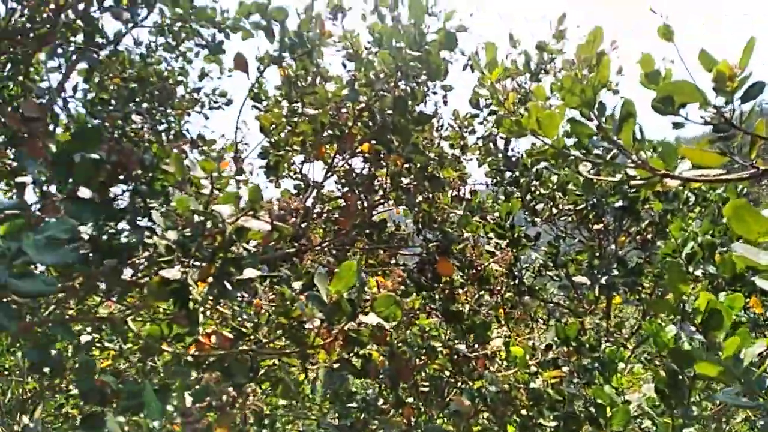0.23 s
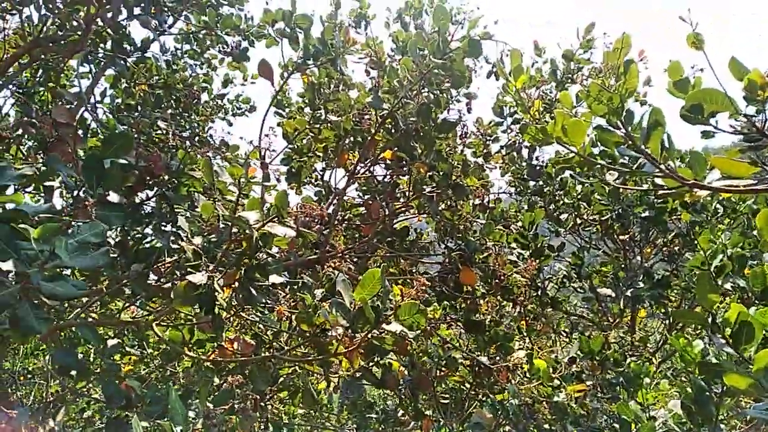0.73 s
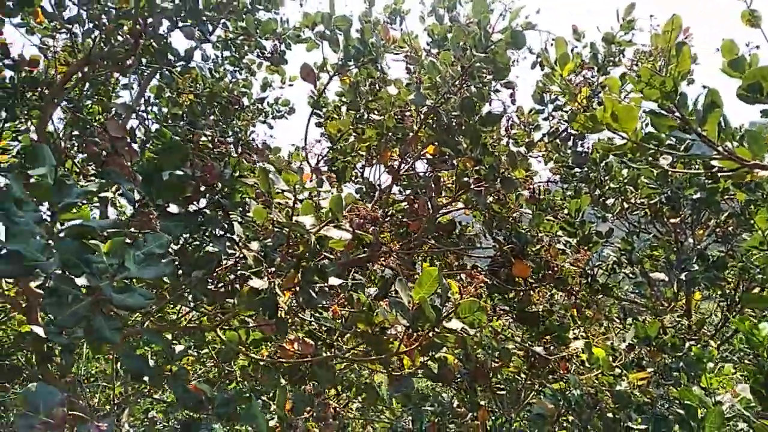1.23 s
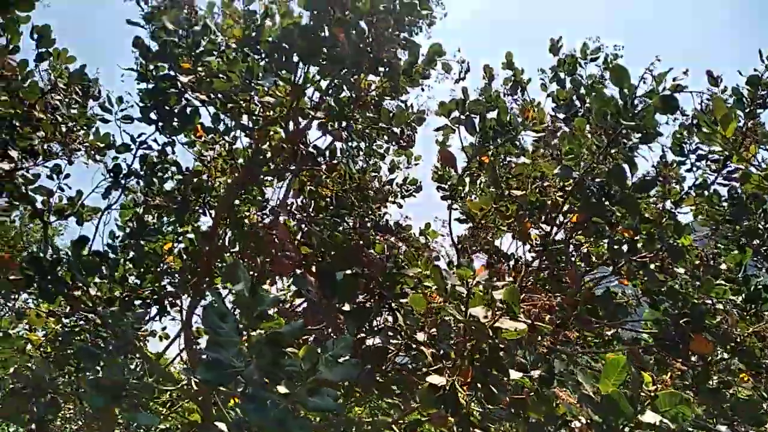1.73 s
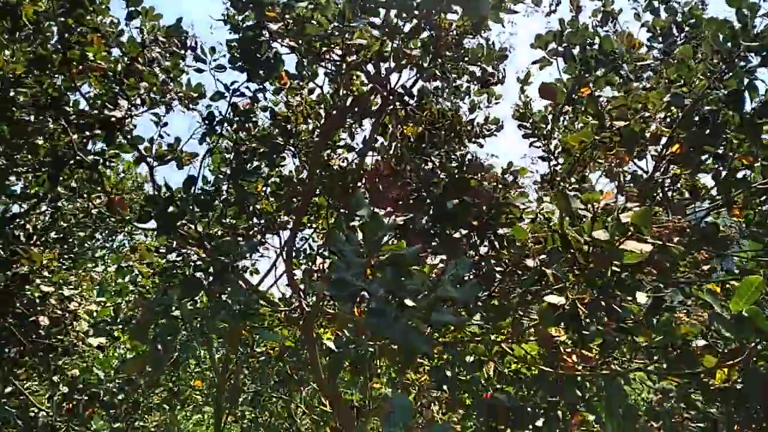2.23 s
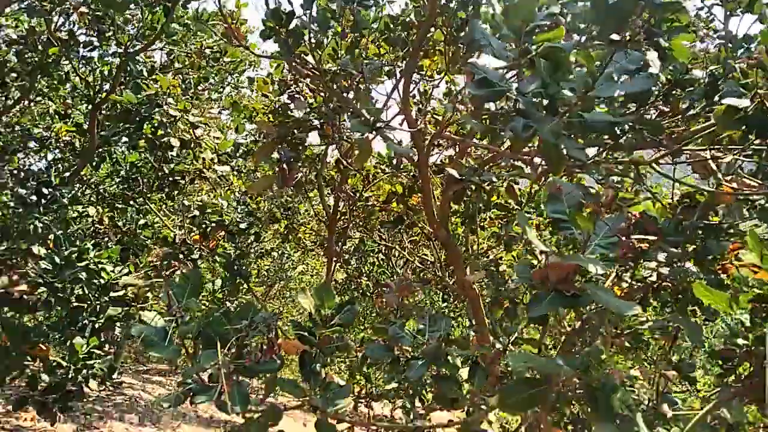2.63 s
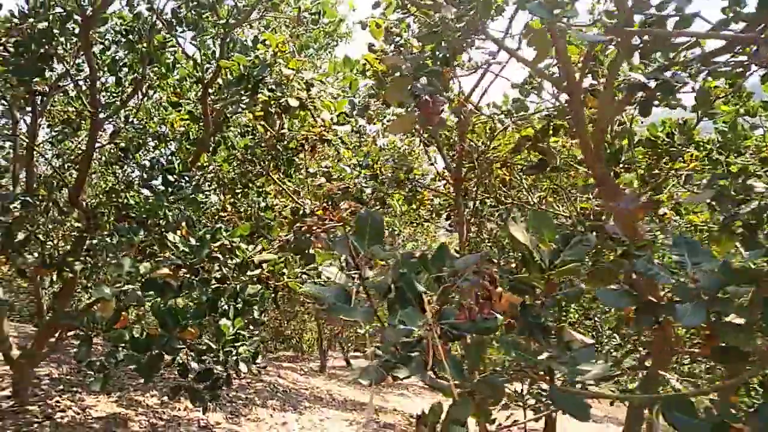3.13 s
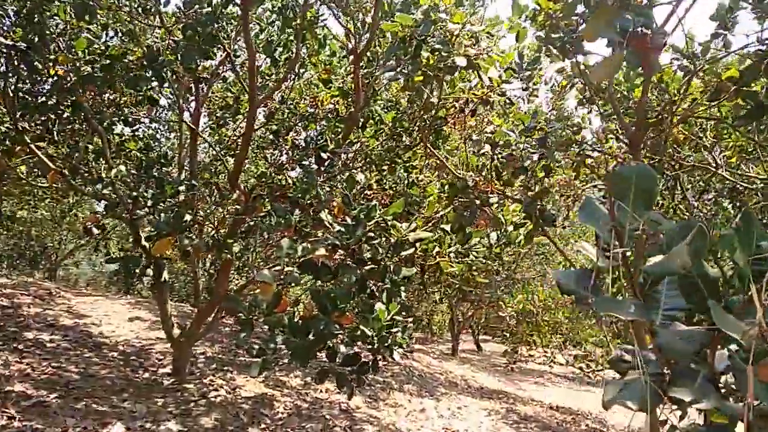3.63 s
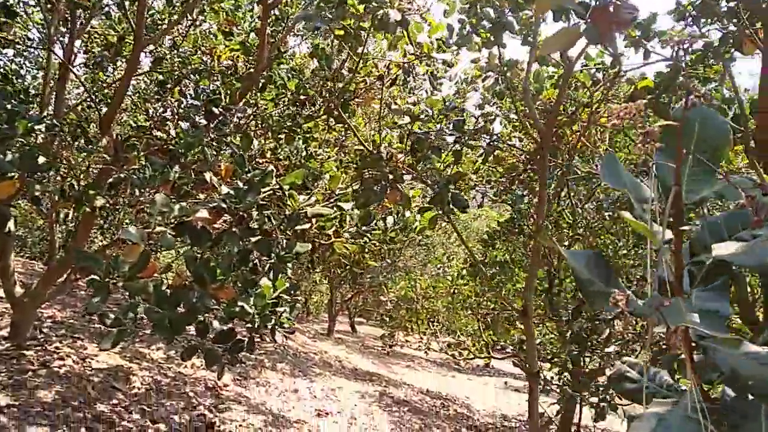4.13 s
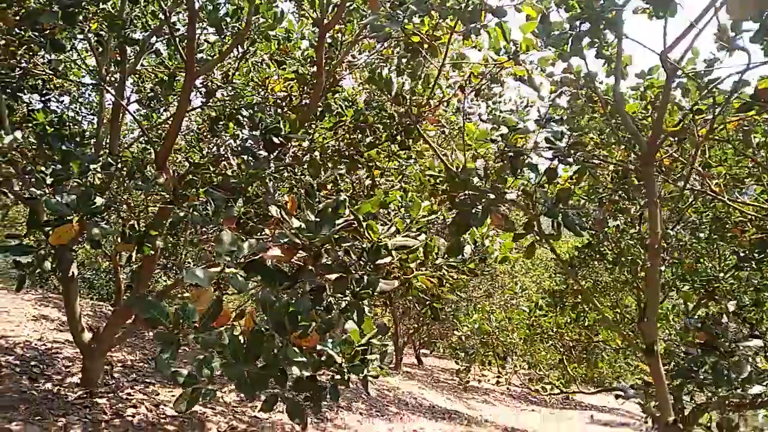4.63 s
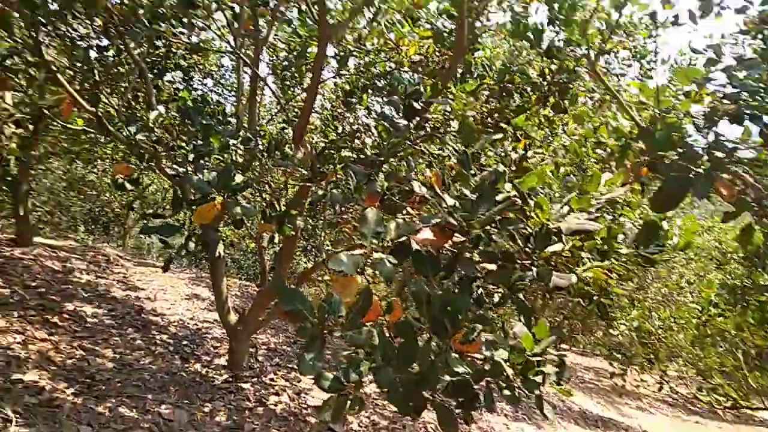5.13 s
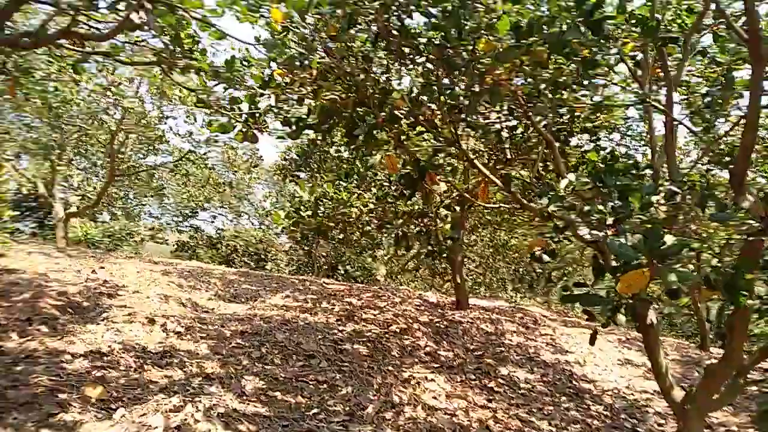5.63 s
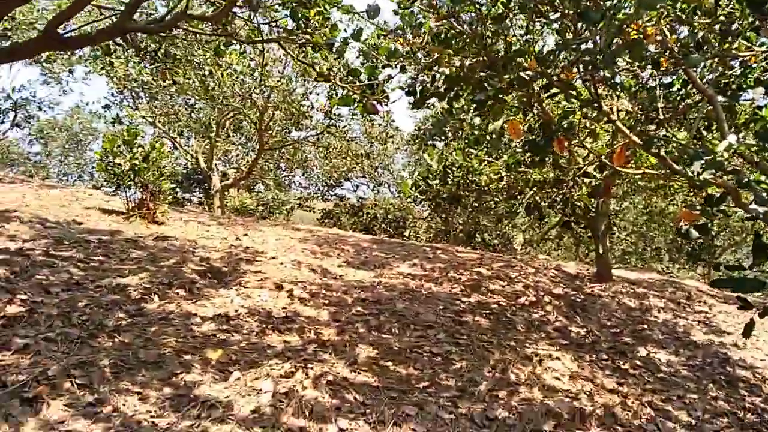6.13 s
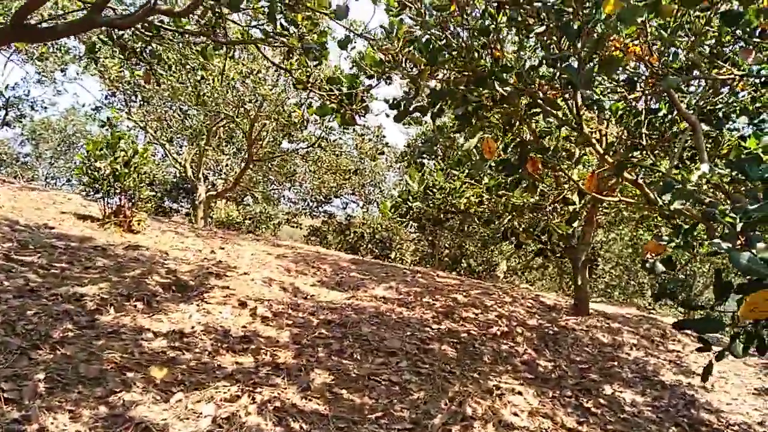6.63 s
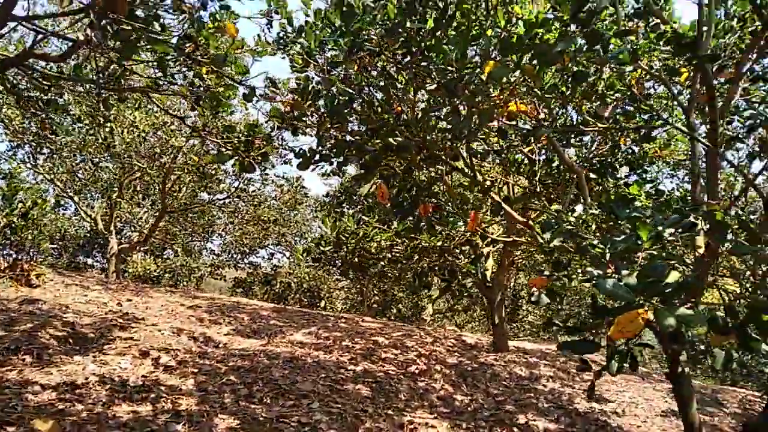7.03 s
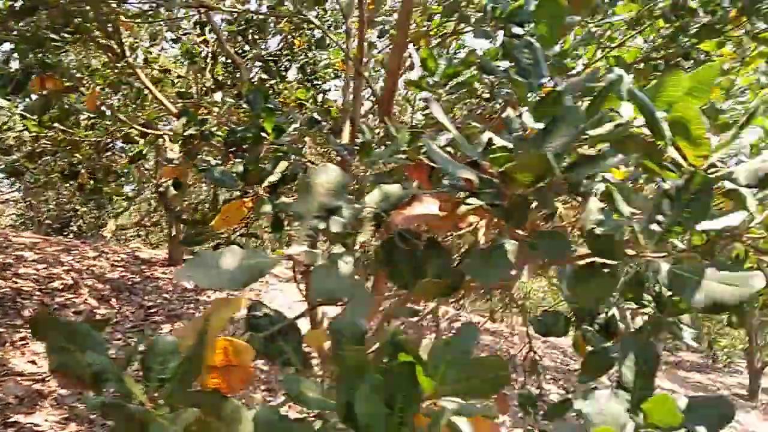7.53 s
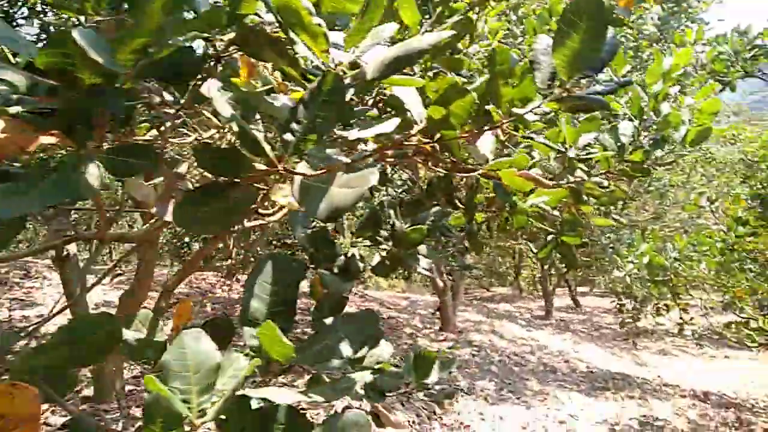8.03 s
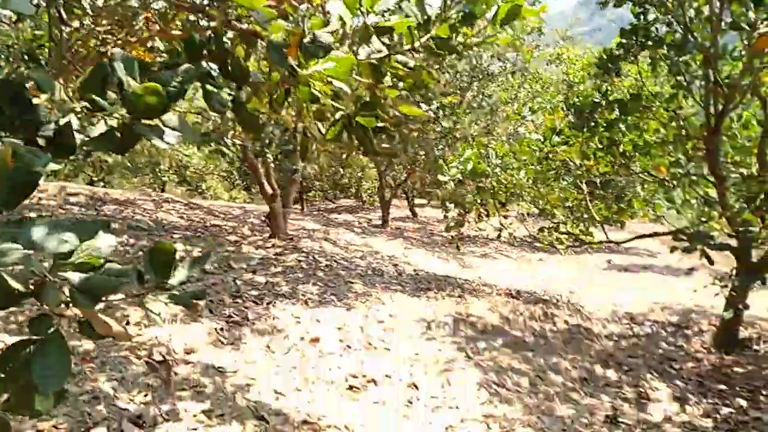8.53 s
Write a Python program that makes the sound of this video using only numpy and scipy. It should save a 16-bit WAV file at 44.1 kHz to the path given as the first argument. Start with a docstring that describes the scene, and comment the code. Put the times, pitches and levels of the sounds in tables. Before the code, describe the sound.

Outdoors among trees, small birds chirp and glide over a faint, regular motor putter. After nearly three quiet seconds, nearby feet crunch irregularly into brittle leaves, with sharp twig cracks and rustling branches. The handheld microphone takes wind directly: deep fluttering gusts switch between left and right, heaviest on the left around seven seconds. A lull in the walking comes before the final crunches.

```python
"""Birds whistle in an orchard's soft hush while a slow one-cylinder engine, perhaps a water pump, thuds far away.
A few leaves snap, then someone walks over dry fallen leaves and brushes through the branches.
Wind, faint at first, buffets the two microphone ports once the walk begins.
Birds and engine are sines and shaped noise, leaves are swarms of tiny decaying cracks,
and wind is low noise with sharp pressure pulses."""
import sys
import numpy as np
from scipy import signal
from scipy.fft import rfft, irfft, next_fast_len
from scipy.io import wavfile
from scipy.ndimage import uniform_filter1d, map_coordinates

SR = 44100
rng = np.random.default_rng(int(sys.argv[2]) if len(sys.argv) > 2 else 0)


def pcm_store(signal):
    """Save signal as 16-bit PCM."""
    levels = np.round(np.clip(np.atleast_2d(signal), -1, 1) * 32767)
    wavfile.write(sys.argv[1], SR, levels.astype(np.int16).T)


N = 387198  # length of the scene in samples
TOP_HZ = 15900  # nothing is heard above this


def amp(db):
    """Decibels to gain."""
    return 10 ** (np.asarray(db) / 20)


def unit(x):
    """Scale a signal to rms 1."""
    return x / np.sqrt(np.mean(x ** 2) + 1e-20)


def along(points, hz):
    """Read (Hz, value) points as a curve on a log frequency axis."""
    f, v = np.transpose(points)
    return np.interp(np.log(hz + 1), np.log(f + 1), v)


def curves(rows):
    """Draw one value per sample for each column after the time."""
    seconds, *columns = np.transpose(rows)
    return [np.interp(np.arange(N) / SR, seconds, column) for column in columns]


def wobble(rate):
    """A smooth random curve with the given number of knots a second."""
    knots = rng.standard_normal(int(N * rate / SR) + 4)
    return map_coordinates(knots, [np.arange(N) * rate / SR])


def filtered(x, response):
    """Shape a signal with a response of frequency, padded so that the ends do not wrap."""
    m = next_fast_len(N + SR // 2)
    return irfft(rfft(x, m) * response(np.fft.rfftfreq(m, 1 / SR)), m)[..., :N]


def coloured(x, spectrum):
    """Shape a signal with a spectrum in dB, then scale it to rms 1."""
    return unit(filtered(x, lambda hz: amp(along(spectrum, hz))))


def noise(alike):
    """White stereo noise whose channels share a part: 0 none, 1 all of it."""
    share = np.clip(alike, 0, 1)
    common = np.sqrt(share) * rng.standard_normal(N)
    return common + np.sqrt(1 - share) * rng.standard_normal((2, N))


def add(track, s, sound):
    """Mix a sound into a track at s seconds."""
    start = max(round(s * SR), 0)
    part = track[..., start:start + sound.shape[-1]]
    part += sound[..., :part.shape[-1]]


def swell(s, attack, hold, release):
    """An envelope that reaches 1 at s seconds, holds, then dies away."""
    t = np.arange(N) / SR - s
    rise = (np.minimum(t, 0) / attack) ** 2
    fall = np.maximum(t - hold, 0) / release
    return np.exp(-np.minimum(rise + fall, 30))


def patchy(x, depth_db):
    """Broad and narrow random patches of level vary the noise's colour over time and frequency."""
    z = signal.stft(x, nperseg=512)[2]
    broad = uniform_filter1d(rng.standard_normal(z.shape[1:]), size=7, axis=0)
    broad = uniform_filter1d(broad, size=10, axis=1)
    narrow = uniform_filter1d(rng.standard_normal(z.shape[1:]), size=8, axis=1)
    shaped = z * amp(depth_db * unit(broad) + 2.2 * unit(narrow))
    return unit(signal.istft(shaped, nperseg=512)[1][:, :N])


# Tone of the orchard's background air. Each row: frequency in Hz, relative level in dB.
AIR_TONE = [(20, -24), (70, -13), (250, 1), (500, 2.5), (1000, -5.5), (2200, -1.5), (4500, -13.5),
            (8000, -13), (16000, -20.5)]


def hush():
    """The orchard's background air is patchy, broad noise, nearly separate at the two ports."""
    return amp(-64.5) * coloured(patchy(noise(0.11), depth_db=2.5), AIR_TONE)


# Bird motifs, as glides through points. Each row: seconds from the motif's start, pitch in Hz before
# the call's pitch ratio, level in dB relative to the call.
FALL = [(0, 1563, -14), (0.031, 1970, -0.5), (0.063, 1870, -3.5), (.092, 1716, -1.5), (.135, 1680, -17)]
RISE = [(0, 2090, 4.5), (.025, 2230, -0.5), (.05, 2480, 0.5), (.075, 2470, -11)]
ARCH = [(0, 1800, 2), (.018, 2300, -5), (.036, 2560, 0), (.06, 2650, -14.5), (.12, 2680, -19)]
SCOOP = [(0, 2440, 0.5), (.03, 2020, -3), (.08, 2016, -3), (.096, 2700, 1), (.118, 3620, -5)]
WARBLE = [(0, 3294, -10), (.024, 2683, -7), (.051, 2310, -1), (0.094, 2502, -3), (0.124, 2600, -10.5),
          (0.179, 2316, -5.5)]
CHIP = [(0, 2182, 1), (.035, 1848, -14)]
# The nearer birds' calls. Each row: start in seconds, motif, level in dB before the trees scatter it,
# pitch ratio.
BIRD_CALLS = [(0, CHIP, -55, 0.95), (.008, FALL, -54.5, 1.01), (.396, ARCH, -50.5, 1),
              (.629, SCOOP, -51.5, 0.97), (.63, RISE, -63, 1.28), (.772, WARBLE, -43.5, 1.01),
              (1.085, CHIP, -61.5, 0.94), (1.245, CHIP, -59, 0.96), (1.747, FALL, -51.5, 0.99),
              (1.79, RISE, -62, 1.01), (1.955, RISE, -61, 1.03), (2.11, RISE, -63, 1),
              (2.275, RISE, -55.5, 1.04), (2.44, RISE, -59, 1.07), (2.465, CHIP, -57, 1.5),
              (2.515, RISE, -59, 1.36), (2.605, RISE, -59.5, 1.02), (2.76, RISE, -60.5, 1.05),
              (2.82, FALL, -53.5, 1), (5.338, RISE, -48.5, 1.06), (5.975, FALL, -52, 0.99),
              (6.39, CHIP, -60, 0.92), (6.505, CHIP, -63, 1.28)]
FAR_BIRD_DB = -76.5  # softest of the farther calls, before scattering


def far_calls():
    """Farther birds chip and whistle at random times, levels and pitches."""
    calls = []
    for k, (when, loud, high) in enumerate(rng.random((70, 3))):
        motif = (RISE, CHIP, CHIP)[k % 3]
        calls.append((8.6 * when, motif, FAR_BIRD_DB + 8 * loud, .7 + .5 * high))
    return calls


def birds():
    """Birds glide through slightly hoarse sine whistles, which the trees scatter into a short tail."""
    whistles = np.zeros(N)
    quaver = 1 + .016 * wobble(350)  # fast pitch jitter makes them hoarse
    for s, motif, db, ratio in list(BIRD_CALLS) + far_calls():
        times, hz, level_db = np.transpose(motif)
        t = np.arange(int(times[-1] * SR)) / SR
        glide = uniform_filter1d(np.interp(t, times, hz), size=SR // 80)
        pitch = glide * ratio * quaver[max(int(s * SR), 0):][:len(t)]
        level = amp(db + np.interp(t, times, level_db))
        fade = signal.windows.tukey(len(t), .12)
        add(whistles, s, fade * level * np.sin(2 * np.pi * np.cumsum(pitch) / SR))
    t = np.arange(SR // 2) / SR
    decay = amp(-60 * t / .55) + amp(-60 * t / .12)  # a long and a short 60 dB decay, in seconds
    tail = rng.standard_normal((2, len(t))) * decay
    scattered = signal.fftconvolve(whistles[None], tail / np.linalg.norm(tail[0]), axes=1)[:, :N]
    return .75 * whistles + scattered


# Two tones of the thud, then the hollow knock. Each row: delay in seconds, pitch in Hz before jitter,
# level in dB before wobble and stereo balance, half-width in seconds.
ENGINE_THUDS = [(0, 104, -57, 0.021), (.004, 165.6, -62.5, 0.015), (.005, 484, -58.5, 0.0035)]
# How loud the clatter is over time. Each row: time in seconds, level in dB.
CLATTER_LEVEL = [(1.4, -81), (1.75, -68), (2.4, -66), (8.7, -74)]
# Tone of the clatter. Each row: frequency in Hz, relative level in dB.
CLATTER_TONE = [(300, -18), (750, 5.5), (1100, -2), (1380, 7.5), (1600, -3), (2100, 0), (6000, -58)]


def engine():
    """Every firing gives a soft exhaust thud and a clatter; a hollow knock keeps its own, slower beat."""
    first, period, knock_period = .059, .0968, .1036  # s
    t = np.arange(N) / SR

    def since_beat(delay, every):
        """Seconds from the nearest beat, negative just before it."""
        return (t - first - delay + every / 2) % every - every / 2

    thud = np.zeros(N)
    for (delay, hz, db, length), every in zip(ENGINE_THUDS, (period, period, knock_period)):
        since = since_beat(delay, every)
        level = amp(db + 3 * wobble(10))
        thud += level * np.exp(-(since / length) ** 2) * np.sin(2 * np.pi * hz * since + wobble(60))
    beat = unit(np.exp(-(since_beat(0.0062, period) / 0.016) ** 2))
    clatter = amp(curves(CLATTER_LEVEL)[0]) * beat * coloured(noise(0.19), CLATTER_TONE)
    return thud * amp([[-2], [2]]) + clatter  # the thud leans right


# Single leaves and twigs that break. Each row: time in seconds (the crack follows 1.1 ms later),
# level in dB before trim and tone, pitch in Hz.
LEAF_SNAPS = [(0.137, -45.5, 8050), (0.339, -44.5, 7440), (0.3589, -28.5, 3930), (1.937, -40.5, 4090),
              (2.194, -41.5, 7300), (2.5053, -41, 6850), (2.8143, -38, 6060), (2.995, -29, 7100),
              (3.916, -28.5, 8350), (3.982, -26, 10500), (4.0055, -23.5, 6500), (4.026, -31, 4000),
              (4.0483, -20, 4330), (5.283, -30.5, 6000), (5.2952, -26, 2900), (5.477, -35.5, 6840),
              (5.773, -23, 2300), (8.1478, -35.5, 8170), (8.274, -29, 7750), (8.6186, -34, 2940)]
BEND_S = 0.0075  # a leaf creaks as it bends, just before it breaks


def snaps():
    """A stiff leaf bends, then breaks with one sharp crack and a short spray of splinters."""
    out, lead = np.zeros((2, N)), .02  # the creak may begin this many seconds early
    t = np.arange(-lead, .12, 1 / SR)
    after, before = np.maximum(t, 0), np.maximum(-t, 0)
    for s, db, hz in LEAF_SNAPS:
        burst = np.sin(2 * np.pi * hz * t) + .6 * rng.standard_normal(len(t))
        crack = burst * np.exp(-after / .0005 - before / .0001)
        spray = 0.2 * np.exp(-after / 0.015 - before / BEND_S) * rng.standard_normal((2, len(t)))
        add(out, s + 0.0011 - lead, amp(db - 1.5) * (crack + spray))
    tone = [(300, -38), (1500, -5.0), (3500, 1.5), (9000, 7.5), (16000, -1.0)]  # (Hz, dB)
    return amp([[-1.5], [1.5]]) * filtered(out, lambda hz: amp(along(tone, hz)))


# Leaves stirred by the walker between the footfalls. Each row: time in seconds, level in dB.
RUSTLE_LEVEL = [(1.2, -86), (1.7, -70), (2.25, -57), (2.64, -74), (2.9, -47), (3.45, -53), (4.35, -43),
                (4.66, -52), (4.88, -44), (5.58, -60), (5.74, -52), (6.1, -73), (6.6, -76), (6.78, -49),
                (7.2, -51), (7.36, -66), (8.18, -62), (8.31, -42), (8.6, -66)]
# A toe or a leg flicks through the leaves. Each row: time in seconds, level in dB.
LEAF_BRUSHES = [(2.22, -51), (3.135, -41), (3.875, -43), (3.915, -38), (3.985, -36), (4.04, -40),
                (5.285, -41), (5.41, -46), (6.651, -47), (7.538, -42), (7.66, -39), (7.985, -50),
                (8.147, -44), (8.215, -41), (8.625, -46)]
BRUSH_ATTACK_S, BRUSH_HOLD_S, BRUSH_RELEASE_S = .007, .016, .019
LIGHT_CRUSH_DB = -13  # without weight on it the litter stays this far under the crackle
# Footfalls. Each row: time of full weight in seconds, rise in seconds, hold in seconds,
# crackle of the top leaves in dB, crush of the litter below in dB.
FOOTFALLS = [(2.991, .055, .02, -37, -49), (3.26, .025, .05, -38, -51), (3.605, .016, .04, -29.5, -40),
             (3.705, .025, .07, -29.5, -44), (4.225, .04, .08, -36.5, -49), (4.41, .04, .045, -36, -39),
             (4.886, .01, .064, -40, -39), (5.159, .05, .03, -35.5, -42), (5.765, .045, .012, -36.5, -47),
             (6.691, .04, .03, -43, -57), (6.976, .06, .035, -39, -46), (7.149, .035, .04, -43, -45),
             (7.366, .008, .02, -63, -53), (7.588, .025, .016, -29, -42), (8.261, .04, .04, -37.5, -47),
             (8.72, .012, .04, -31.5, -39)]
STEP_RELEASE_S = .036  # the leaves settle as the weight lifts


def pressure():
    """Footfalls load both leaf layers, brushes and rustle mainly the top: gains of crackle and crush."""
    light = amp(curves(RUSTLE_LEVEL)[0]) ** 2  # touches add as power
    for s, db in LEAF_BRUSHES:
        light = light + (amp(db) * swell(s, BRUSH_ATTACK_S, BRUSH_HOLD_S, BRUSH_RELEASE_S)) ** 2
    crackle, crush = light, light * amp(LIGHT_CRUSH_DB) ** 2
    for s, rise, hold, crackle_db, crush_db in FOOTFALLS:
        weight = swell(s, rise, hold, STEP_RELEASE_S)
        crackle = crackle + (amp(crackle_db) * weight) ** 2
        crush = crush + (amp(crush_db) * weight) ** 2
    return np.sqrt(crackle), np.sqrt(crush)


def fractures(gain, rate, low_hz, high_hz, cycles, spread_db, lag_s):
    """Tiny leaf cracks at rms 1: sparse under a light touch, crowded under weight."""
    density = np.sqrt(gain / gain.max()) + .45
    total = np.cumsum(density) * rate / SR
    starts = np.searchsorted(total, rng.uniform(0, total[-1], int(total[-1])))
    pitch, size, side, place = rng.random((4, len(starts), 1))
    hz = low_hz + pitch * (min(high_hz, TOP_HZ) - low_hz)
    strength = amp(-spread_db * np.log(size + .02)) * np.sqrt(hz)  # many small cracks, few big ones
    ticks = np.arange(SR // 300)
    pair = []
    for port in (-1, 1):
        # each leaf lies in its own direction and reaches one port first
        lag = lag_s * (1 + port * (2 * place - 1))
        turns = hz * np.maximum(ticks / SR - lag, 0)
        ring = np.sin(2 * np.pi * turns) * np.exp(-turns / cycles)
        cracks = strength * (1 + port * (side - .5)) * ring
        pair.append(np.bincount((starts[:, None] + ticks).ravel(), cracks.ravel(), N)[:N])
    return unit(np.array(pair) / np.sqrt(density))  # crowding alone does not make it louder


def close_ports(pair, corner_hz):
    """Waves longer than the spacing of the ports reach both alike."""
    apart = lambda hz: hz ** 2 / np.hypot(hz ** 2, corner_hz ** 2)
    mid = filtered((pair[0] + pair[1]) / 2, lambda hz: np.sqrt(2 - apart(hz) ** 2))
    side = filtered((pair[0] - pair[1]) / 2, apart)
    return np.array([mid + side, mid - side])


# Tone of the brittle top leaves. Each row: frequency in Hz, relative level in dB.
CRACKLE_TONE = [(700, -24.5), (1600, -11.5), (2500, -5.5), (3700, -5.5), (5200, -6), (7600, 0.5),
                (11000, -2.5), (13500, -4.5), (16000, -4.5)]
# Tone of the crushed litter. Each row: frequency in Hz, relative level in dB.
CRUSH_TONE = [(150, 2.5), (400, -4.5), (800, -1), (1150, -1), (1700, 1.5), (2800, -3), (5000, -4.5),
              (12000, -50)]
CLUMP_DB, CLUMPS_PER_S = 0.75, 90  # uneven clumps of leaves make the level flicker


def footsteps():
    """Brittle top leaves crackle and slide while the litter beneath is crushed."""
    crackle, crush = pressure()
    clumps = amp(CLUMP_DB * wobble(CLUMPS_PER_S))
    top = fractures(crackle, rate=4200, low_hz=1200, high_hz=15500, cycles=1.1, spread_db=2.8, lag_s=.00012)
    below = fractures(crush, rate=1100, low_hz=350, high_hz=4500, cycles=1.3, spread_db=3.2, lag_s=.00008)
    # noise between the cracks is the sliding
    top = close_ports(patchy(top + .5 * noise(0), depth_db=2.2), corner_hz=2500)
    below = patchy(below + .4 * noise(.8), depth_db=1.9)
    layers = crackle * coloured(top, CRACKLE_TONE) + crush * coloured(below, CRUSH_TONE)
    return clumps * amp(0.5) * layers


# Short dull noises: an engine knock at 1.711 s, then two scuffs of a sole on soil.
# Each row: time of the peak in seconds, level in dB, half-width in seconds.
KNOCK_AND_SCUFFS = [(1.711, -54, 0.0047), (3.264, -51, 0.042), (6.8, -44, 0.039)]
# Tone shared by the knock and the scuffs. Each row: frequency in Hz, relative level in dB.
DULL_TONE = [(100, -33), (350, -4), (850, 1), (1400, -14.5), (5000, -26)]


def knock_and_scuffs():
    """An engine knock, then two scuffs of a sole on soil: short swells of dull, nearly mono noise."""
    t = np.arange(N) / SR
    swells = sum(amp(db) * np.exp(-((t - s) / length) ** 2) for s, db, length in KNOCK_AND_SCUFFS)
    return swells * coloured(noise(0.99), DULL_TONE)


# Steady breeze on the ports. Each row: time in seconds, left and right strength in dB before wobble and trim.
BREEZE_STRENGTH = [(2.2, -63, -62.5), (2.86, -61, -60.5), (2.93, -47, -41.5), (3.3, -46, -53),
                   (3.67, -48, -39.5), (4.15, -43, -40.5), (4.55, -33, -41.5), (5.2, -44.5, -38),
                   (5.42, -63.5, -68), (5.72, -41.5, -51), (6, -42, -38.5), (6.38, -61, -56),
                   (6.62, -46.5, -49.5), (6.8, -29, -46), (7.5, -28, -34), (7.82, -52, -48),
                   (8.3, -35.5, -33.5), (8.78, -49, -44.5)]
# Gusts that build and break in a hard eddy. Each row: time of the break in seconds, build-up in seconds,
# rumble strength in dB before wobble and trim, strength of the eddy's push in dB, port (0 left, 1 right).
WIND_GUSTS = [(2.545, .015, -48, -44, 1), (3.68, 0.026, -32, -33, 0), (3.842, 0.0034, -43, -23, 1),
              (4.001, 0.018, -34, -22.5, 1), (4.354, 0.022, -36, -20.5, 1), (4.533, 0.015, -39, -16.5, 0),
              (4.575, 0.0047, -35, -23, 0), (4.719, 0.021, -37, -17, 0), (5.209, 0.031, -33.5, -22.5, 1),
              (6.176, 0.092, -28, -14.5, 0), (6.301, 0.023, -25, -12.5, 0), (6.495, 0.043, -31, -14.5, 0),
              (6.878, 0.0094, -32, -16, 0), (6.966, 0.033, -17, -8, 0), (7.116, 0.066, -20.5, -2.5, 0),
              (7.43, 0.052, -30, -23.5, 1), (7.879, 0.043, -30, -22, 1), (7.973, 0.009, -29, -16.5, 1),
              (8.169, 0.0062, -51, -14.5, 1), (8.46, 0.091, -31, -21, 1), (8.758, 0.047, -32, -20, 1)]
GUST_ATTACK_S, GUST_RELEASE_S = 0.016, 0.043


def airflow():
    """Wind strength in dB at each port: the breeze with the gusts on top."""
    power = amp(curves(BREEZE_STRENGTH)) ** 2
    for s, build, db, _, port in WIND_GUSTS:
        gust = amp(db) * swell(s - build, GUST_ATTACK_S, build, GUST_RELEASE_S)
        power[int(round(port))] += gust ** 2
    return 10 * np.log10(power)


EDDY_WIDTH_S = 0.00055  # the push of an eddy at full scale
EDDY_SPAN_S = .05  # room on either side of the push


def eddy(db):
    """A hard eddy pushes, then sucks, at the membrane."""
    t = np.arange(-EDDY_SPAN_S, EDDY_SPAN_S, 1 / SR)
    width = EDDY_WIDTH_S * amp(-db / 3)  # the stronger the eddy, the sharper its push
    push = np.exp(-np.minimum((t / width) ** 2, 50))
    after = np.maximum(t, 0)
    rebound = 1.04 * np.sin(2 * np.pi * 95 * after) * np.exp(-after / 0.0076)
    return amp(db) * (push - rebound)


# Tone of the wind's rumble. Each row: frequency in Hz, relative level in dB.
RUMBLE_TONE = [(20, -27), (40, -11), (75, 4), (120, 0.5), (190, -10), (280, -23.5), (420, -42.5),
               (800, -59.5)]
# Tone of the finer flutter. Each row: frequency in Hz, relative level in dB.
FLUTTER_TONE = [(90, -26), (200, 7), (330, 1), (520, -22), (800, -20), (1500, -62)]
LEAD_EDDY_DB = -6  # smaller eddies during the build-up, relative to the last


def wind():
    """Turbulence rumbles at each port separately; gusts shed small eddies, then break in a hard one."""
    t = np.arange(N) / SR
    level_db = airflow() + 1.9 * np.array([wobble(22), wobble(22)])
    flow = coloured(noise(0), RUMBLE_TONE)
    # level the noise, so that the wind strength alone sets the swells
    flow = flow / np.sqrt(np.abs(uniform_filter1d(flow ** 2, size=SR // 14, axis=1)))
    # faster air sheds smaller eddies, so the flutter grows more steeply than the rumble
    flutter = amp(1.78 * level_db + 2.0) * np.abs(flow) * coloured(noise(0), FLUTTER_TONE)
    rising = np.interp(t, [1.7, 2.2], [.4, 1])  # fainter before the walk
    out = rising * (amp(level_db + 2.0) * flow + flutter)
    for s, build, _, db, port in WIND_GUSTS:
        track = out[int(round(port))]
        add(track, s - EDDY_SPAN_S, eddy(db))
        # three lead eddies, loosely spaced
        for early in (np.arange(3) + rng.random(3) + .5) / 3:
            add(track, s - early * build - EDDY_SPAN_S, eddy(db + LEAD_EDDY_DB))
    return out


def scene():
    """Feet and wind close by; birds, engine and the hush of the orchard behind."""
    return hush() + birds() + engine() + snaps() + footsteps() + knock_and_scuffs() + wind()


# Colour of the two ports. Each row: frequency in Hz, left minus right in dB.
PORT_BALANCE = [(100, -0.5), (700, -1), (1300, 3), (2400, 1), (4400, -3), (8000, -4), (14000, 3.5)]
LOW_CUT_HZ = 21


def record(dry):
    """Each port has its own colour; the strongest buffets saturate; the deepest bass and the top are cut."""
    def port_colour(hz):
        """Half the difference goes to each port."""
        balance = along(PORT_BALANCE, hz)
        return amp(np.array([balance, -balance]) / 2)

    heard = filtered(dry, port_colour)
    limited = heard / (1 + (heard / .52) ** 6) ** (1 / 6)  # saturates towards .52
    return filtered(limited, lambda hz: hz ** 2 / np.hypot(hz ** 2, LOW_CUT_HZ ** 2) * (hz < TOP_HZ))


dry = scene()
out = record(dry)
pcm_store(out)
```